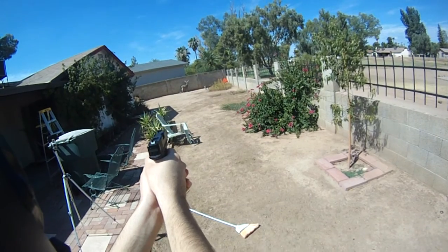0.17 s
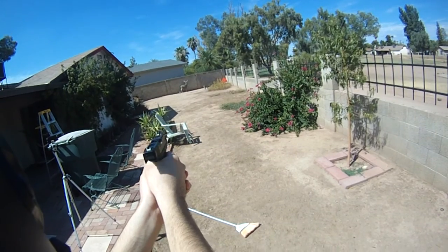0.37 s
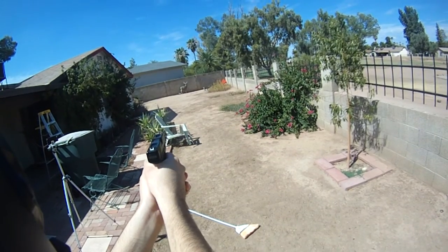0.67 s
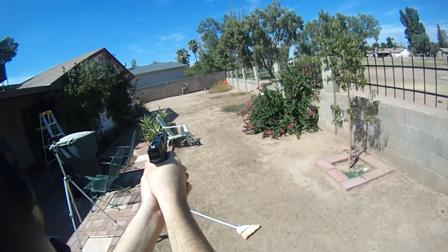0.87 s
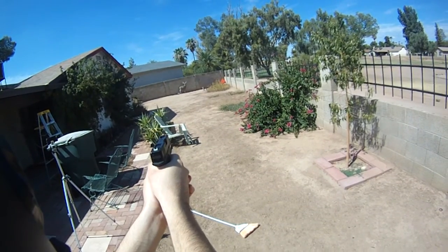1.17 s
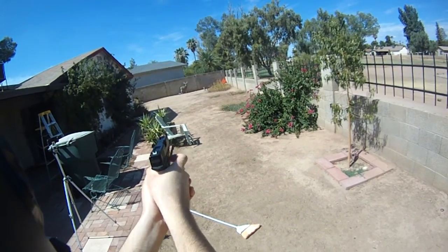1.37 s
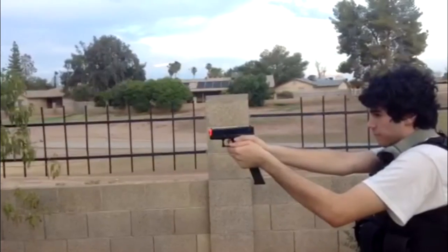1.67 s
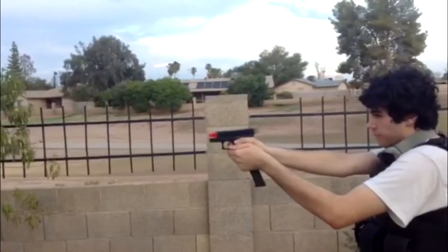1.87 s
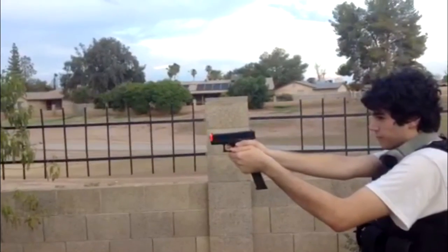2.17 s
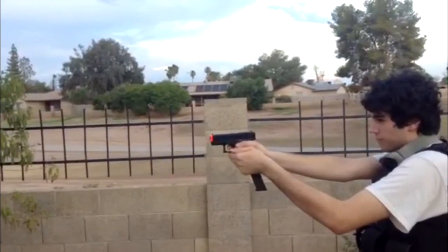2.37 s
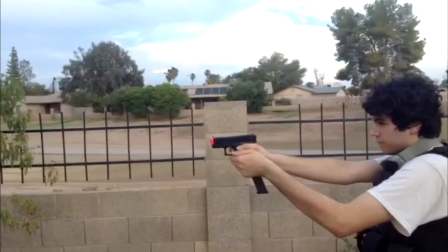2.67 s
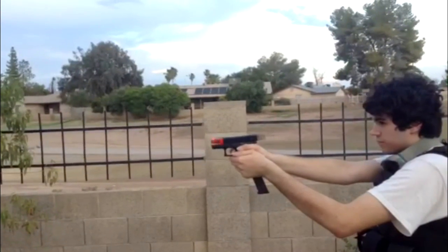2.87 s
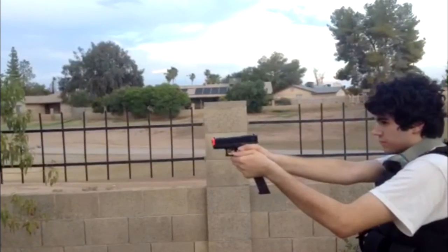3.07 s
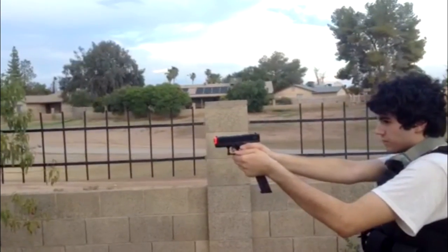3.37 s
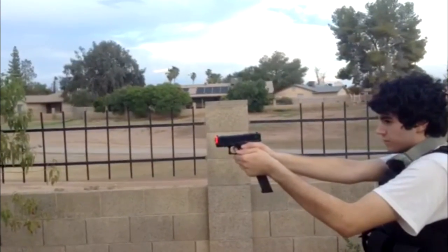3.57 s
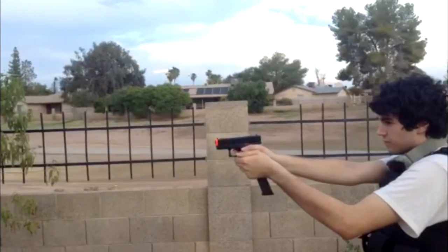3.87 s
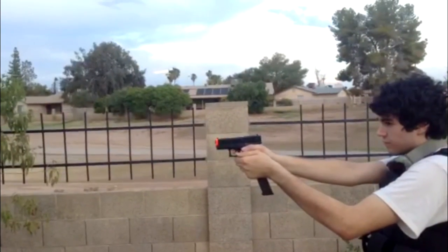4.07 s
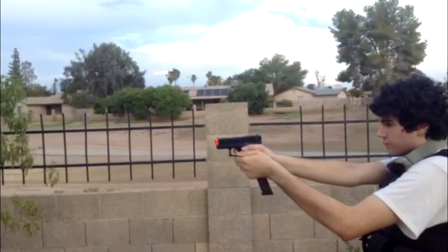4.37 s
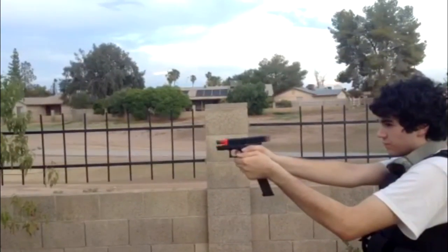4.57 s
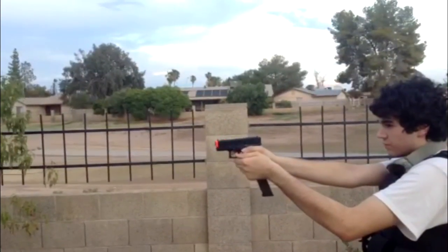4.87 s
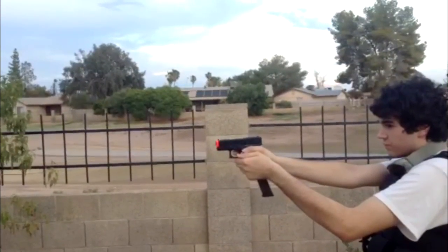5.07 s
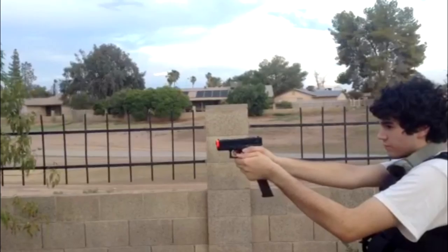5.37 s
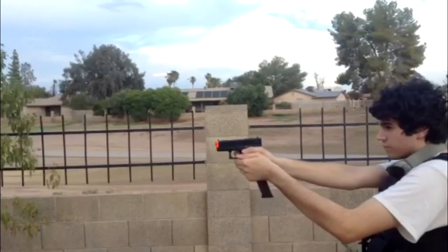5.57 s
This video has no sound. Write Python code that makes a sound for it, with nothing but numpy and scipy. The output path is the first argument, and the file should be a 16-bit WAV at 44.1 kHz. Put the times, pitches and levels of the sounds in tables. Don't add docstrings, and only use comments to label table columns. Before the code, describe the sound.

Close gas pistol fire in a walled backyard. The first burst rings narrow and boxy inside a camera housing, nearly silent around it. Then, from an open microphone at the side, repeated bursts snap, pop and rattle metallically with short wall echoes; the first shots choke the microphone. Pellet ticks, soft hiss and hum fill the gaps.

```python
import sys
import numpy as np
from scipy import signal
from scipy.fft import rfft, irfft, next_fast_len
from scipy.io import wavfile
from scipy.ndimage import uniform_filter1d

SR = 44100
rng = np.random.default_rng(int(sys.argv[2]) if len(sys.argv) > 2 else 0)


def volts_from_db(level):
    exponent = np.asarray(level, float) / 20
    return 10 ** exponent


def transcribe(signal):
    frames = np.atleast_2d(signal).T
    limited = np.clip(frames, -1, 1)
    pcm = np.round(limited * 32767).astype(np.int16)
    wavfile.write(sys.argv[1], SR, pcm)


N = 252681
T = np.arange(N) / SR


def unit(x):
    return x / np.sqrt(np.mean(x ** 2) + 1e-20)


def along(points, hz):
    f, v = np.transpose(points)
    return np.interp(np.log(hz + 1), np.log(f + 1), v)


def filtered(x, response):
    m = next_fast_len(N + SR // 2)
    return irfft(rfft(x, m) * response(np.fft.rfftfreq(m, 1 / SR)), m)[:N]


def resonant(x, modes):
    def response(hz):
        body = 0
        for k, (center_hz, width_hz, db) in enumerate(modes):
            damping = 1j * hz * max(width_hz, 300)
            body = body + (-1) ** k * volts_from_db(db) * damping / (center_hz ** 2 - hz ** 2 + damping)
        return unit(np.abs(body)) * np.exp(1j * np.angle(body))
    return filtered(x, response)


def bursts(times_s, dbs, t60, rise, crack=0.):
    t = np.arange(SR // 16) / SR
    decay = volts_from_db(np.asarray(dbs)[:, None] - 60 * t / np.reshape(t60, (-1, 1)))
    shape = (1 - np.exp(-t / rise)) * decay
    spikes = volts_from_db(3.5 * rng.standard_normal(shape.shape))
    sound = shape * rng.standard_normal(shape.shape) * spikes
    sound *= (np.linalg.norm(shape, axis=1) / np.linalg.norm(sound, axis=1))[:, None]
    sound[:, 1] += crack * volts_from_db(dbs)
    at = np.round(np.asarray(times_s) * SR).astype(int)[:, None] + np.arange(len(t))
    return np.bincount(at.ravel(), sound.ravel(), N + SR)[:N]


def low_cut(x, hz):
    return signal.sosfilt(signal.butter(N=4, Wn=hz, btype="high", fs=SR, output="sos"), x)


# (gas released [s], pressure step [dB], slide at stop after [ms], stop peak [dB],
# rebound after [ms])
SHOTS = [(1.704, -5, 7, -12, 17), (1.755, -5, 7, -12, 17), (1.8057, -6, 7, -12, 18.3),
         (1.8494, -11, 7.2, -9, 17.6), (1.8903, -6, 7.4, -15, 17.6), (2.7555, -6, 6.9, -16, 17),
         (2.7972, -6, 8.1, -11, 18), (2.8415, -19, 7.8, -8, 15.1), (2.8829, -14, 7.9, -9, 17.4),
         (2.9248, -11, 8.5, -9, 15.2), (3.6558, -6, 6.9, -13, 16.8), (3.6996, -10, 6.7, -8, 14.7),
         (3.7397, -16, 7.2, -8, 16.8), (3.7822, -13, 8.4, -10, 18), (3.8246, -11, 9.6, -9, 18.4),
         (4.5263, -20, 7.8, -5, 15.9), (4.568, -6, 9.3, -10, 18), (4.6125, -9, 9.5, -10, 19.4),
         (4.6566, -14, 10, -9, 20.6), (4.7035, -16, 11.6, -10, 23.7), (4.7531, -18, 12.7, -13, 25.5),
         (5.6126, -25, 11.6, -12, 23.5), (5.6656, -13, 16.2, -14, 27.5), (5.7276, -25, 17, -12, 27)]
# (time [s], peak level [dB])
HAMMER = [
    (1.7012, -17),
    (1.7885, -28),
    (2.7508, -25),
    (2.7535, -21),
    (3.6505, -25),
    (3.6535, -21),
    (4.5195, -26),
    (4.5235, -23),
    (5.5935, -38),
    (5.6078, -21),
]
# (frequency [Hz], width [Hz], level [dB])
SLIDE_MODES = [(2140, 180, 1), (5400, 810, 6), (7820, 790, 0.5), (9960, 1000, -0.5), (13600, 2500, -2.5)]
GAS_MODES = [(1111, 480, -5), (4170, 2970, -4.5), (7600, 6100, -10), (12700, 4500, -12.5)]
FRAME_MODES = [(670, 2600, -1.5), (2220, 1300, 4), (5900, 1500, -1.5)]
PIN_MODES = [(10500, 6300, 7), (13600, 2300, -23)]


def pistol():
    s, db, bright_db = rattles()
    closing = resonant(bursts(*slams() - [[.0002], [3]], t60=.022, rise=.0001, crack=.9), SLIDE_MODES)
    gas_s = np.transpose(SHOTS)[0]
    blast_db = -5.5 + rng.standard_normal(len(gas_s))
    valve = bursts(gas_s, blast_db - 3, t60=.012, rise=.00005, crack=3)
    muzzle = bursts(gas_s + .0011, blast_db - 2, t60=.008, rise=.00005, crack=3)
    blasts = volts_from_db(2.0) * resonant(valve + muzzle, GAS_MODES)
    hammer = resonant(bursts(*np.transpose(HAMMER), t60=.13, rise=.00053), GAS_MODES)
    dull = bursts(s, db - .5 * bright_db - 9, t60=.027, rise=.000068, crack=1.26)
    bright = bursts(s, db + .5 * bright_db - 3, t60=.016, rise=.0002, crack=2.5)
    return closing + blasts + hammer + resonant(dull, FRAME_MODES) + resonant(bright, PIN_MODES)


LAST_SLAMS_S = [
    1.9285,
    2.9617,
    3.8631,
    4.8029,
]
SLAM_LEAD_S, PAUSE_S, SLAM_DB = .0059, .2, -2.5


def slams():
    gas_s = np.transpose(SHOTS)[0]
    inside_s = gas_s[1:][np.diff(gas_s) < PAUSE_S] - SLAM_LEAD_S
    s = np.sort(np.append(inside_s, LAST_SLAMS_S))
    return np.array([s, SLAM_DB + 0 * s])


# (after the gas [ms], peak level [dB], brightness [dB])
LOOSE = [
    (5.97, -14, 10),
    (14.72, -8, -1),
    (24.13, -17, 2),
    (30.63, -26, 7.5),
]
# (after the last closing [ms], peak level [dB], brightness [dB])
SETTLE = (22, -21, -7)
STOP_BRIGHT_DB, REBOUND_DB, SCATTER_DB, SCATTER_S = -9, -11.5, 1.5, .0002
REBOUND_BRIGHT_DB_PER_MS = .54


def rattles():
    rows = [(s + SETTLE[0] / 1000, *SETTLE[1:]) for s in LAST_SLAMS_S]
    for s, _, stop_ms, stop_db, rebound_ms in SHOTS:
        stop = (stop_ms, stop_db, STOP_BRIGHT_DB)
        rebound = (rebound_ms, REBOUND_DB, REBOUND_BRIGHT_DB_PER_MS * (rebound_ms - 15))
        rows += [(s + ms / 1000, db, bright_db) for ms, db, bright_db in [stop, rebound, *LOOSE]]
    scatter = rng.standard_normal((len(rows), 3)) * [SCATTER_S, SCATTER_DB, SCATTER_DB]
    return np.transpose(rows + scatter)


BARREL_HZ, BARREL_T60_S = 2344, .045
BARREL_GAIN_DB_PER_S = 1.5


def barrel():
    out, t = np.zeros(N + SR), T[:SR // 16]
    for (s, db), (detune, spread) in zip(slams().T, rng.standard_normal((len(SHOTS), 2))):
        level_db = db - 16.5 + BARREL_GAIN_DB_PER_S * s + 2.3 * spread
        swell = (1 - np.exp(-t / .0011)) * volts_from_db(level_db - 60 * t / (BARREL_T60_S * volts_from_db(spread)))
        hz = BARREL_HZ * (1 + .018 * detune)
        out[round(s * SR):][:len(t)] += swell * np.sin(2 * np.pi * hz * t)
    return out[:N]


# (gas released [s], slide closed before [ms], slide at stop after [ms],
# shot level [dB], recoil level [dB])
CASED_SHOTS = [
    (.3668, 0, 7.6, -9, 1),
    (.4157, 7.6, 9.7, -9, 0),
    (.4701, 7.8, 10.7, -6, 1),
    (.5284, 7.5, 10.6, -5, 0),
    (.5876, 8.1, 11.4, -8, 1),
    (.647, 7.6, 14.6, -7, -2),
    (.7026, 4.3, 13.1, -9, -12),
    (.7569, 7.1, 9.9, -9, -14),
]
# (after the stop [ms], peak level [dB], thump below it [dB])
CASED_RECOIL = [
    (0, -14, -7),
    (11.7, -11, -34),
    (22.8, -23.5, -20),
    (30.7, -28, -11.5),
]
SLAM_THUMP_DB, GAS_THUMP_DB = -27, -17


def cased_contacts():
    rows = []
    for s, lead_ms, stop_ms, db, recoil_db in CASED_SHOTS:
        if lead_ms > 0:
            rows.append((s - lead_ms / 1000, db, SLAM_THUMP_DB))
        rows.append((s, db, GAS_THUMP_DB))
        rows += [(s + (stop_ms + ms) / 1000, peak + recoil_db, thump) for ms, peak, thump in CASED_RECOIL]
    return np.transpose(rows)


# (frequency [Hz], width [Hz], level [dB])
CASE_MODES = [(2900, 700, -15), (4200, 400, -8), (5120, 350, 0), (5480, 330, -1), (7100, 500, -14),
              (9450, 400, -12), (11900, 600, -26), (14600, 900, -26)]
THUMP_MODES = [(420, 140, -1.5), (1150, 140, -3.5), (1950, 690, -2)]
# (time [s], peak level [dB])
CASED_HAMMER = [
    (.3642, -18),
]
# (time [s], peak level [dB])
CASED_TICKS = [
    (0.9757, -40),
    (1.0006, -43),
    (1.1024, -46),
    (1.1635, -33),
    (1.1872, -40),
    (1.2216, -50),
    (1.2394, -58),
]
# (time [s], peak level [dB])
KNOCK = [
    (0.046, -48.5),
]
# (time [s], level [dB])
CASED_ECHO_GAIN = [(.36, -16.5), (.68, -13), (.7, 0), (.735, -13), (.75, -10.5), (.85, 0), (.865, -8),
                   (1.4, -18)]


def head_camera():
    s, db, thump_db = cased_contacts()
    steel_t60 = np.where(db < -10, .007, .013)
    steel = bursts(s - .0004, db + 2.5, t60=steel_t60, rise=.00075)
    hammer = bursts(*np.transpose(CASED_HAMMER), t60=.1, rise=.00098)
    steel = volts_from_db(1.0) * resonant(steel + hammer, CASE_MODES)
    clicks = resonant(bursts(*np.transpose(CASED_TICKS) - [[0], [8]], t60=.051, rise=.00049), CASE_MODES)
    thumps = resonant(bursts(s, db + thump_db + 5, t60=.022, rise=.0002), THUMP_MODES)
    thumps = filtered(thumps, lambda hz: 1 / (1 + 1j * hz / 3000) ** 2)
    knock = resonant(bursts(*np.transpose(KNOCK), t60=.02, rise=.0016), THUMP_MODES[1:2])
    echoes = yard(steel + .677 * thumps + clicks, delay_s=.004, stretch=.71, count=4)
    echoes = volts_from_db(np.interp(T, *np.transpose(CASED_ECHO_GAIN))) * echoes
    return low_cut(steel + thumps + clicks + knock + echoes, hz=80) + cased_ambience()


CHOKE_S = [
    .0415,
    .0335,
    .0135,
]
BLINK_S, PUSH_LAG_S, STOP_PUSH_LAG_S, STOP_PUSH_DB = .003, .0015, .0008, -5


def pushes():
    chokes_s = CHOKE_S + [BLINK_S] * len(SHOTS)
    gas = [(row[0] + PUSH_LAG_S, row[1], choke_s) for row, choke_s in zip(SHOTS, chokes_s)]
    stop = [(s + ms / 1000 + STOP_PUSH_LAG_S, db + STOP_PUSH_DB, BLINK_S)
            for s, _, ms, db, _ in SHOTS[len(CHOKE_S):]]
    return gas + stop


# (time [s], peak level [dB])
STIRS = [
    (1.7706, -21),
    (1.7731, -25),
    (1.7769, -24),
]
GROGGY_DB, GROGGY_S = 2, .024


def side_camera():
    dry = pistol()
    small = ticks()
    echoes = volts_from_db(-9.5) * yard(dry, delay_s=.0024, stretch=.87, count=5)
    echoes += volts_from_db(-10) * yard(small, delay_s=.034, stretch=1.2, count=3)
    steps, deaf_db, t = np.zeros(N + SR), np.zeros(N + SR), T[:SR // 16]
    after = np.clip(t - .0006, 0, None)
    suck = -2.3 * np.exp(-.5 * ((t - .0003) / .00013) ** 2)
    phase = 2 * np.pi * 172 * after + .6 * (1 - np.exp(-after / .00049))
    ring = 1.12 * volts_from_db(-60 * after / .018) * np.sin(phase)
    for s, db, choke_s in pushes():
        at, free = round(s * SR), round((s + choke_s) * SR)
        depth_db = np.clip(1900 * choke_s - 14, 3, 36) + np.clip(2 * (db + 11), -5, 10)
        steps[at:][:len(t)] += volts_from_db(db + .25 * (db + 5)) * (suck + volts_from_db(.3 * (db + 5)) * ring)
        closes, opens = np.clip(t / .0003, 0, 1), np.clip((choke_s - t) / .0015, 0, 1)
        deaf_db[at:][:len(t)] -= depth_db * closes * opens
        if choke_s > BLINK_S:
            deaf_db[free:][:len(t)] -= GROGGY_DB * np.exp(-t / GROGGY_S)
    freeing = bursts(*np.transpose(STIRS), t60=.002, rise=.00002)
    heard = low_cut(dry + barrel() + small + echoes, hz=140) + ambience()
    return volts_from_db(deaf_db[:N]) * heard + low_cut(steps[:N], hz=41) + freeing


# (time [s], peak level [dB], brightness [dB], t60 [s])
TICKS = [(2.2337, -33.5, -21, 0.025), (2.2598, -44, -5, 0.025), (2.2894, -39, -5, 0.029),
         (2.3282, -40, 9, 0.036), (3.2064, -35.5, -22, 0.044), (3.2446, -17.5, 11, 0.081),
         (3.3044, -45, -7, 0.035), (3.3618, -34.5, -23, 0.097), (3.6143, -31, -9, 0.012),
         (4.138, -35.5, -1, 0.068), (4.1559, -33, 8.5, 0.084), (4.1834, -32, -3, 0.029),
         (4.2537, -28, -15, 0.022), (4.2618, -35, -17, 0.12), (4.305, -44, 9, 0.029),
         (4.4727, -41, -5, 0.049), (5.0044, -40, -10, 0.025), (5.0344, -37, -14, 0.032),
         (5.0894, -45, -5, 0.025), (5.1567, -41, 10, 0.05), (5.1769, -34.5, 11, 0.083),
         (5.2016, -37, 13, 0.042), (5.22, -37.5, -10, .04)]


def ticks():
    s, db, bright_db, t60 = np.transpose(TICKS)
    dull = resonant(bursts(s, db - 6.5, t60, rise=.00026, crack=1.6), FRAME_MODES)
    bright = resonant(bursts(s, db + bright_db - 21.5, t60, rise=.00044, crack=2.5), GAS_MODES[2:])
    return filtered(dull + bright, lambda hz: 1 / (1 + (hz / 13800) ** 12))


# (frequency [Hz], t60 [s])
YARD_T60 = [(200, 0.44), (1000, 0.3), (5000, 0.32), (14000, 0.21)]


def yard(x, delay_s, stretch, count):
    hz, t, z = signal.stft(rng.standard_normal((count, SR // 2)), SR, nperseg=256)
    decay = volts_from_db(-60 * t / (stretch * along(YARD_T60, hz))[:, None])
    tails = signal.istft(z * decay, SR, nperseg=256)[1]
    turns = np.arange(N) // 300 % count == np.arange(count)[:, None]
    echo = signal.fftconvolve(x * turns, tails / np.linalg.norm(tails[0]), axes=1).sum(0)
    return np.pad(echo, (round(delay_s * SR), 0))[:N]


def rush(spectrum, lo_hz, hi_hz, patchy_db):
    z = signal.stft(rng.standard_normal(N + 512), nperseg=512)[2]
    field = uniform_filter1d(uniform_filter1d(rng.standard_normal(z.shape), 4, 0), 8, 1)
    x = signal.istft(z * volts_from_db(patchy_db * unit(field)), nperseg=512)[1][:N]

    def response(hz):
        band = (hz < 13600) / (1 + (lo_hz / (hz + 1)) ** 4) / (1 + (hz / hi_hz) ** 4)
        return volts_from_db(along(spectrum, hz)) * band
    return unit(filtered(x, response))


HUM_DB, DUCKED_DB, HOLD_S, RECOVER_DB_PER_S = -45, -54.5, .14, 9
HISS_DB, HISS_AFTER_DB = -51.5, -56


def ducking():
    since_s = T - np.append(-SR, LAST_SLAMS_S)[np.searchsorted(LAST_SLAMS_S, T)]
    hum_db = np.clip(DUCKED_DB + RECOVER_DB_PER_S * (since_s - HOLD_S), DUCKED_DB, HUM_DB)
    return hum_db, np.where(T < SHOTS[0][0], HISS_DB, HISS_AFTER_DB)


# (frequency [Hz], density [dB per Hz])
AIR = [(18, -87), (30, -71), (103, -17.5), (223, 0.5), (424, -16), (640, -8.5), (786, -15), (1250, -13.5),
       (1530, -18), (3770, -29.5), (5840, -34.5), (8810, -33.5), (14000, -48.5)]
# (frequency [Hz], rms level [dB])
FAN = [(656.8, -57), (732.1, -73), (1238, -58), (1351, -61)]
DRONE_S, DRONE_RISE_S, DRONE_DB = 5.2, .082, -48


def ambience():
    hum_db, hiss_db = ducking()
    hum = volts_from_db(hum_db + 1.5) * rush(AIR, 20, 1800, patchy_db=.8)
    hiss = volts_from_db(hiss_db) * rush(AIR, 1800, 30000, patchy_db=0)
    drift = np.cumsum(rng.standard_normal((len(FAN), N)), axis=1) * .0197
    swell = np.clip((T - DRONE_S) / DRONE_RISE_S, 0, 1)
    drone = volts_from_db(DRONE_DB) * swell * rush(AIR, 200, 250, patchy_db=.5)
    lines = sum(volts_from_db(db - 5.5) * np.sin(2 * np.pi * hz * T + d) for (hz, db), d in zip(FAN, drift))
    return hum + hiss + drone + lines


# (frequency [Hz], density [dB per Hz])
CASED_AIR = [(24, -33.5), (40, -1.5), (86, -16), (234, 0), (421, -2), (856, -4.5), (1430, -7), (2850, -7.5),
             (10200, -15.5), (13000, -21), (14000, -21.5)]
# (time [s], level [dB])
CASED_AIR_LEVEL = [(0, -64.5), (.35, -67.5), (.9, -62.5), (1.4, -64.5)]
# (frequency [Hz], rms level [dB])
MAINS = [(118, -79)]


def cased_ambience():
    level = volts_from_db(np.interp(T, *np.transpose(CASED_AIR_LEVEL)))
    air = level * rush(CASED_AIR, 20, 30000, patchy_db=0)
    return air + sum(volts_from_db(db - 2) * np.sin(2 * np.pi * hz * T) for hz, db in MAINS)


CUT_S, FADE_S = 1.411, .006


def scene():
    side = np.clip((T - CUT_S) / FADE_S + .5, 0, 1)
    return ((1 - side) * head_camera() + side * side_camera())[None]


def band_limit(x):
    return signal.sosfilt(signal.butter(12, 16460, fs=SR, output="sos"), x)


def record(dry):
    x = filtered(np.clip(dry[0], -1, 1), lambda hz: 1 / (1 + (hz / 15400) ** 40))[None]
    return band_limit(np.clip(x, -1, 1))


dry = scene()
out = record(dry)
transcribe(out)
```